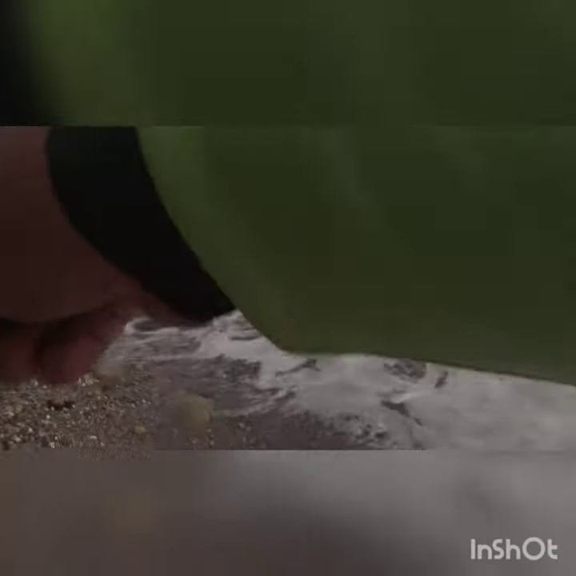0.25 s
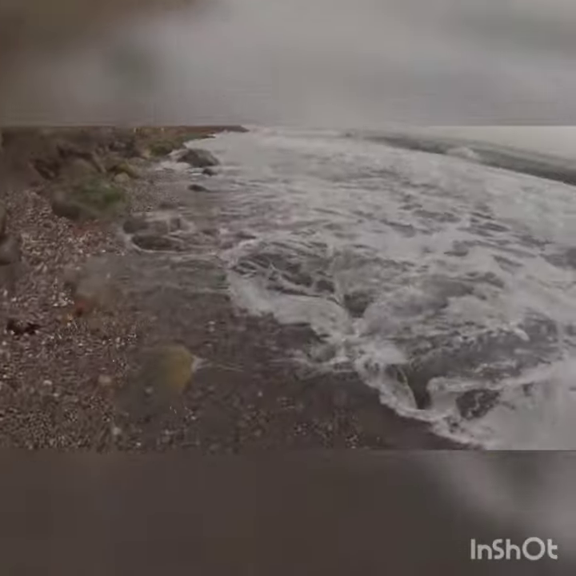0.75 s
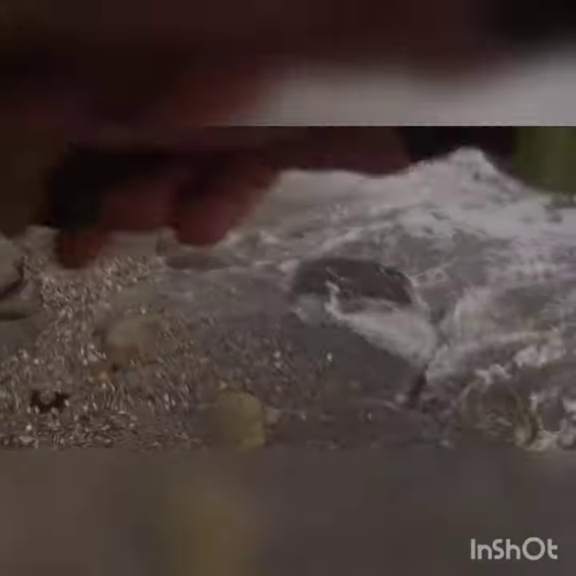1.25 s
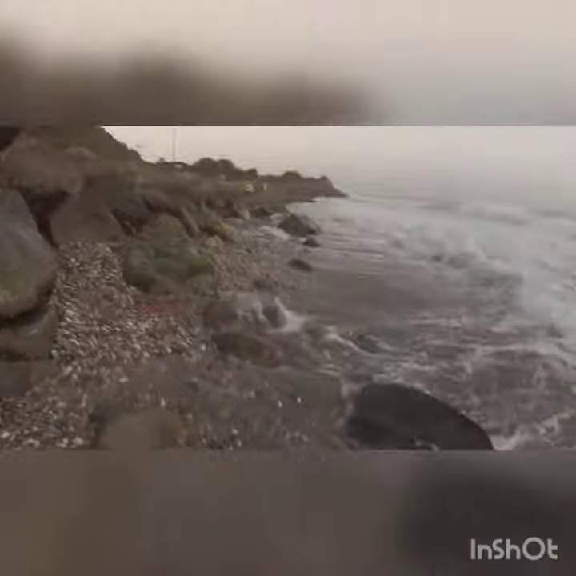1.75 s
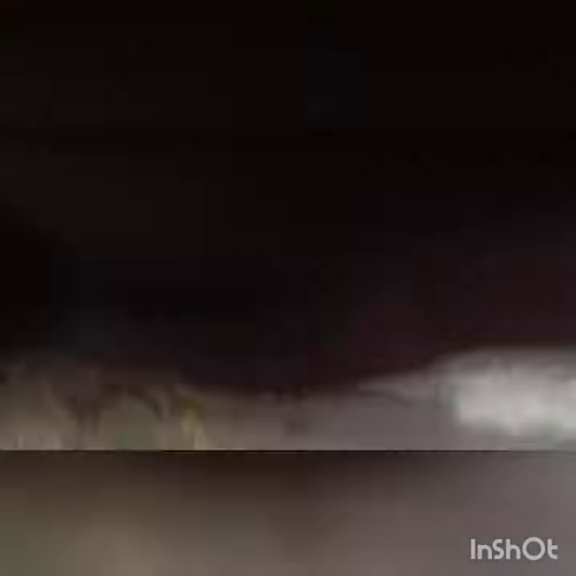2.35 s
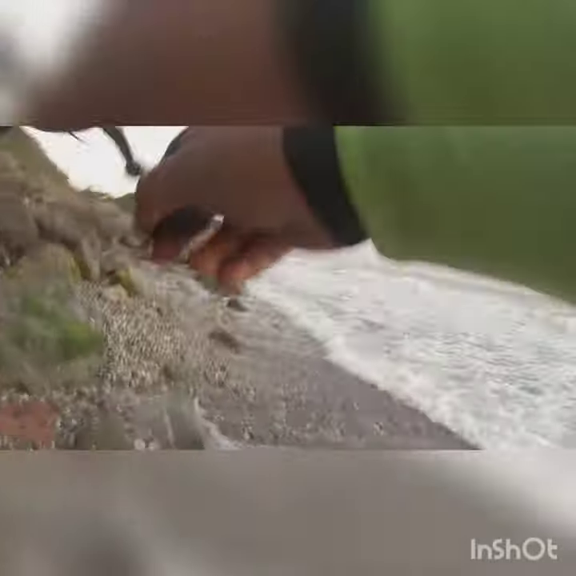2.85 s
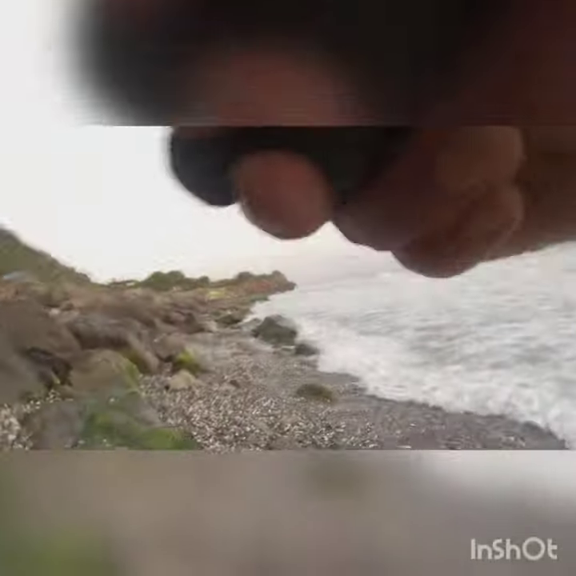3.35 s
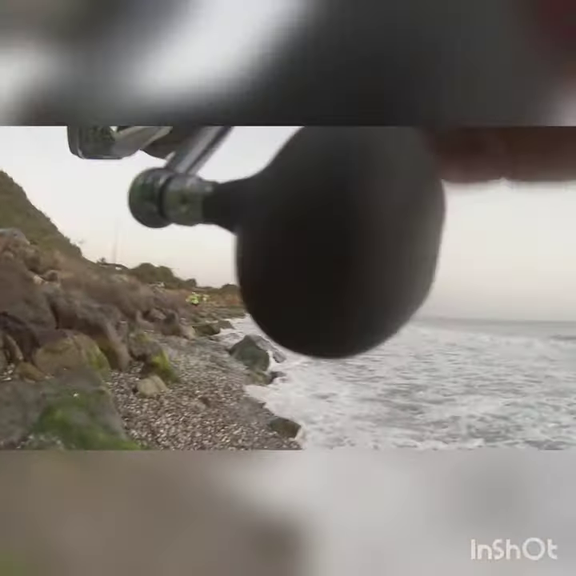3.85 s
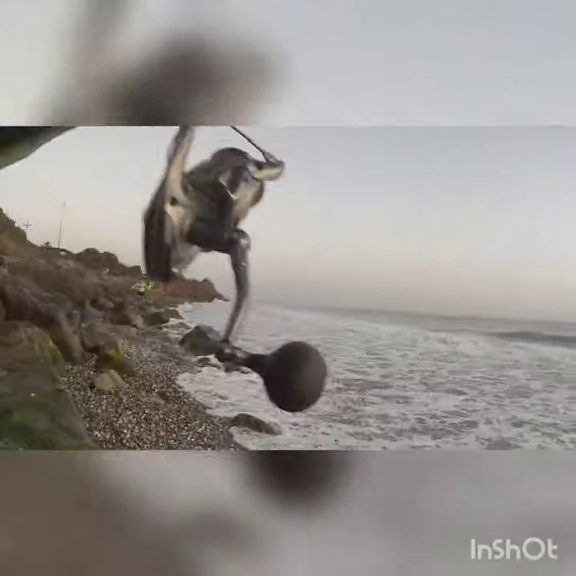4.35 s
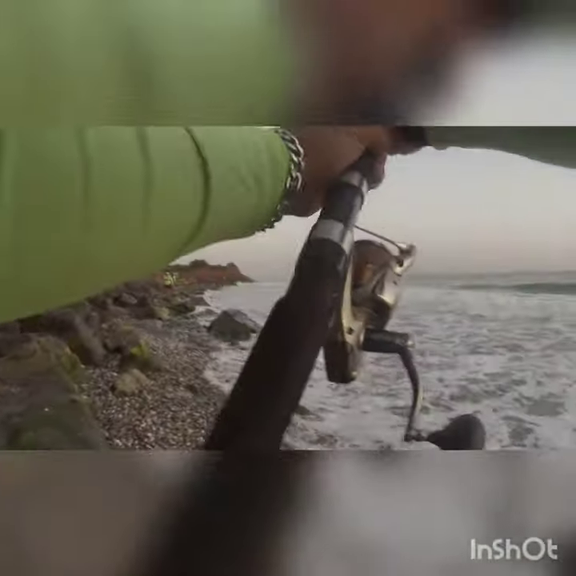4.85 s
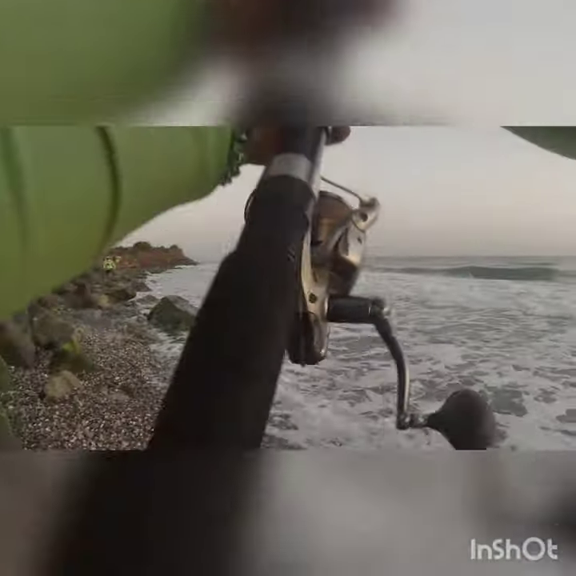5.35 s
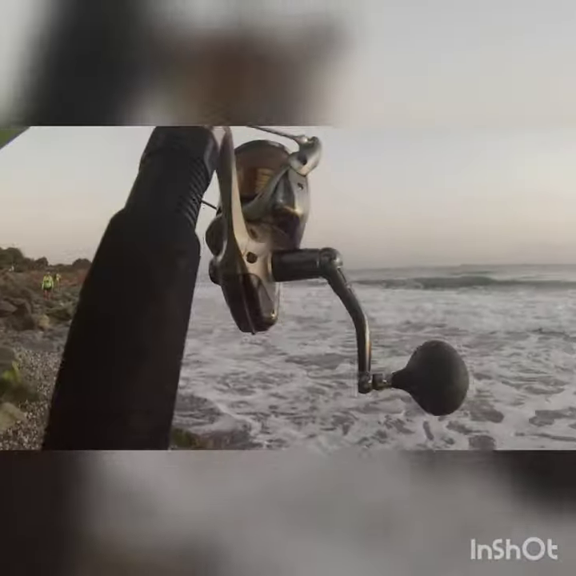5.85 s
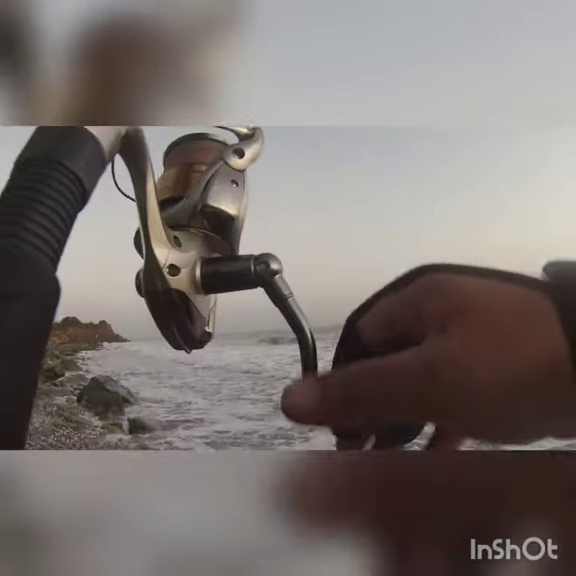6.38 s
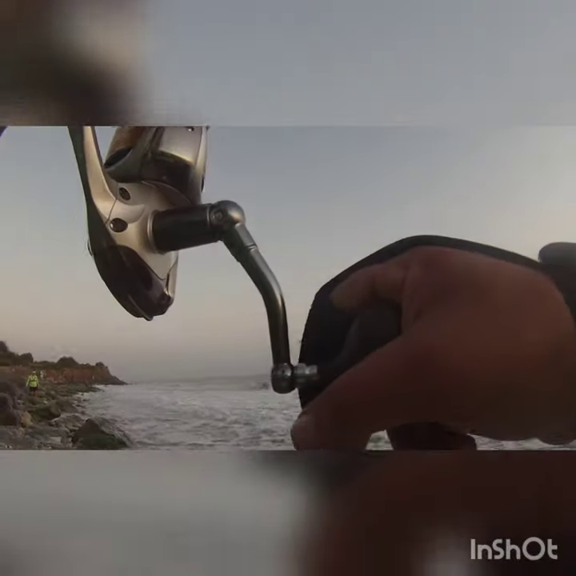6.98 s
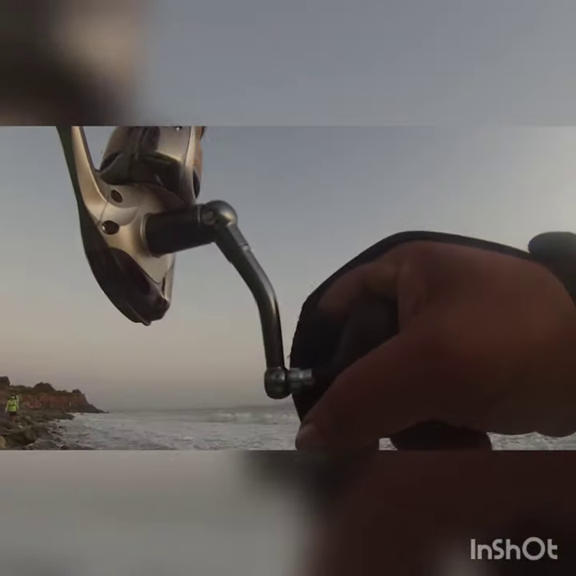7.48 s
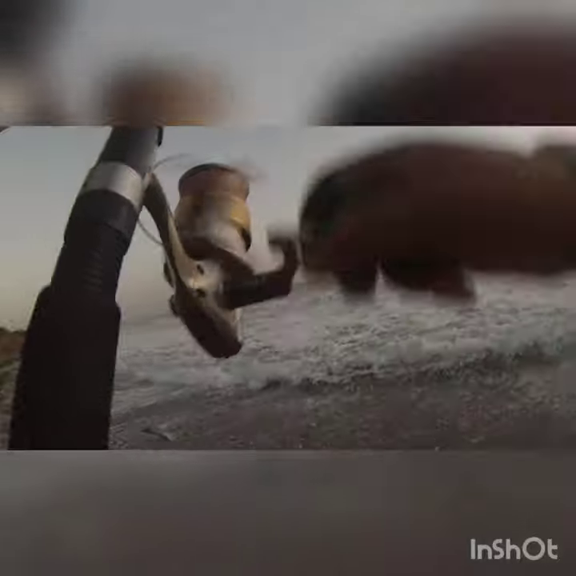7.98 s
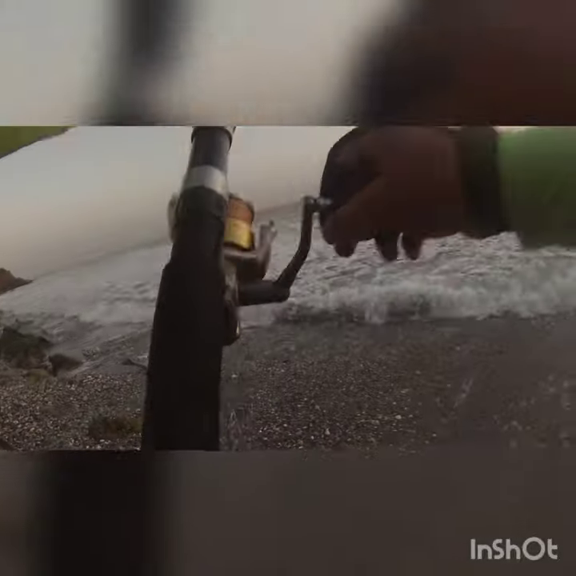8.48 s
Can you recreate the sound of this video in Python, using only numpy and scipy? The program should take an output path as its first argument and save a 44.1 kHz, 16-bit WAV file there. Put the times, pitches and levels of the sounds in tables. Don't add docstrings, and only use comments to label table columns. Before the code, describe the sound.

Continuous hissing, foamy sea wash, close and slightly muffled by a camera shell worn on the body. Soft thuds and cloth brushes come first, then one sharp, heavy plastic crack far louder than everything else. The surf ducks briefly, a wave breaks over pebbles, faint metallic reel clicks scatter, the water eases, and the last, biggest wave surges up.

```python
import sys
import numpy as np
from scipy import signal
from scipy.fft import rfft, irfft, next_fast_len
from scipy.io import wavfile
from scipy.ndimage import uniform_filter1d, map_coordinates

SR = 44100
rng = np.random.default_rng(int(sys.argv[2]) if len(sys.argv) > 2 else 0)


def ratio_of_db(decibels):
    return 10 ** (np.asarray(decibels, float) / 20)


def inscribe(sig):
    pcm = np.round(np.clip(np.atleast_2d(sig).T, -1, 1) * 32767)
    wavfile.write(sys.argv[1], SR, pcm.astype(np.int16))


N = 384552
CLAMP_S = 2.41


def unit(x):
    return x / np.sqrt(np.mean(x ** 2) + 1e-20)


def along(points, hz):
    f, v = np.transpose(points)
    return np.interp(np.log(hz + 1), np.log(f + 1), v)


def curves(rows):
    s, *cols = np.transpose(rows)
    return [np.interp(np.arange(N) / SR, s, c) for c in cols]


def wobble(rate):
    knots = rng.standard_normal(int(N * rate / SR) + 4)
    return map_coordinates(knots, [np.arange(N) * rate / SR])


def filtered(x, gain):
    m = next_fast_len(N + SR // 4)
    return irfft(rfft(x, m) * gain(np.fft.rfftfreq(m, 1 / SR)), m)[:N]


def patchy(depth_db):
    z = signal.stft(rng.standard_normal(N), nperseg=512)[2]
    field = uniform_filter1d(rng.standard_normal(z.shape), 6, 0)
    field = uniform_filter1d(field, 10, 1)
    return signal.istft(z * ratio_of_db(depth_db * unit(field)), nperseg=512)[1][:N]


def steady(x, span):
    return x / np.sqrt(np.abs(uniform_filter1d(x ** 2, round(span * SR))) + 1e-20)


def hiss(count, hz):
    b, a = signal.iirpeak(min(hz, .4 * SR), 1.3, SR)
    once = signal.lfilter(b, a, rng.standard_normal(count))
    return unit(signal.lfilter(b, a, once))


def ring(t, hz, t60):
    return ratio_of_db(-60 * t / t60) * np.sin(2 * np.pi * hz * t)


def add(track, s, x):
    track[round(s * SR):][:len(x)] += x


def cavity(hz):
    # centre_hz, width_hz, level_db
    cavity_modes = [(990, 620, 2.5), (1273, 114, 1.5), (1590, 740, 5), (2080, 83, -4), (2440, 130, 4),
                    (2867, 140, 5), (3300, 770, 4.5), (4670, 210, 8.5), (5310, 130, 5.5), (5614, 300, 7.5),
                    (6250, 190, 3.5), (7750, 390, -5.5), (7960, 370, 4.5), (9900, 900, -2),
                    (13700, 970, -4), (14700, 1300, 2.5)]
    return ratio_of_db(sum(db / (1 + (2 * (hz - centre) / width) ** 2) for centre, width, db in cavity_modes))


def clamp_db():
    fall_s, quick_db, recover_s, lasting_db = .015, -8.5, 0.48, -7.5
    since = np.maximum(np.arange(N) / SR - CLAMP_S, 0)
    return np.clip(since / fall_s, 0, 1) * (lasting_db + quick_db * np.exp(-since / recover_s))


def surf():
    # pitch_hz, density_db (per Hz)
    sea_spectrum = [(71, -20), (120, -5), (184, 0), (389, 0), (841, -10.5), (1510, -8), (2050, -10.5),
                    (3340, -9.5), (5010, -20), (9210, -21.5), (15300, -30)]
    splits_hz = [800, 2100, 4200]
    # start_s, strength_db, foam_db
    wave_course = [(0, -52.5, 2), (.42, -50, 3.5), (.75, -50.5, 4.5), (1.17, -47.5, -0.5), (1.24, -46.5, 1),
                   (1.95, -46, 4.5), (2.3, -45, 0.5), (3.2, -40.5, 0.5), (3.5, -43, -3), (4, -45.5, -1.5),
                   (4.75, -48.5, -2), (5, -45.5, -1.5), (5.25, -49, -2.5), (5.65, -47, 0), (6.5, -48.5, 0),
                   (7.25, -46.5, 1), (7.75, -41.5, 0.5), (8.4, -35.5, -3)]
    # over_calm_db, db_per_strength_db, db_per_foam_db, grit (0-1)
    registers = [
        (-0.5, .5, -0.5, 0.07),
        (-1, 0.76, -0.04, 0.1),
        (-0.5, 0.91, 0.86, 0.14),
        (-7, 0.55, 0.46, 0.3),
    ]
    # start_s, share (0-1)
    facing = [(0, 0.33), (.8, 0.1), (1.6, 0.3), (2.3, 0.7), (3, 0.1), (3.8, 0.1), (4.6, 0.26), (5.4, 0.3),
              (6.2, 0.44), (7, 0.55), (7.6, 0.98), (8.1, 0.7), (8.72, 0.6)]
    calm_db = -47
    edges = [100, *splits_hz, 16000]
    surge = .15 * wobble(3) + .45 * wobble(10)
    struck = rng.random(N) < 600 / SR
    grain_db = np.minimum(4 * rng.exponential(size=N), 12)
    grains = unit(struck * ratio_of_db(grain_db) * rng.standard_normal(N))
    strength_db, foam_db = curves(wave_course)
    sea = np.zeros(N)
    for k, (over_db, grows, foams, grit) in enumerate(registers):
        low_hz, high_hz = edges[k], edges[k + 1]
        db = calm_db + over_db + grows * (strength_db - calm_db) + foams * foam_db

        def colour(hz):
            band = np.sqrt(np.abs(1 / (1 + (hz / high_hz) ** 8) - 1 / (1 + (hz / low_hz) ** 8)))
            return band * cavity(hz) ** 0.63 * ratio_of_db(along(sea_spectrum, hz))

        water = filtered(patchy(depth_db=1.5) + grit * grains, colour)
        sea += ratio_of_db(db + clamp_db() + surge + .3 * wobble(7)) * unit(water)
    boxed = ratio_of_db(-2.5) * filtered(sea, lambda hz: cavity(hz) ** .8 / np.sqrt(1 + (hz / 11000) ** 4))
    share = np.clip(curves(facing)[0], 0, 1)
    return (1 - share) * sea + share * boxed


def knock():
    # start_s, peak_db, hardness_db (per octave above 1 kHz)
    blows = [
        (2.3512, -6.5, 0.5),
        (2.3604, -20.5, -15),
        (2.4553, -46, -21),
    ]
    # pitch_hz, level_db, t60_s
    shell_modes = [(1036, -6.5, 0.025), (1160, -2, 0.02), (1326, 3.5, 0.013), (1500, 0, 0.015),
                   (1800, -6, 0.02), (2400, -3, 0.015), (2970, -8.5, 0.026), (3270, -7.5, 0.019),
                   (4600, -2, 0.0069), (5500, -13, 0.009), (6400, -7.5, 0.0068), (8000, -17.5, .01)]
    out, t = np.zeros(N), np.arange(SR // 5) / SR
    for s, db, hard_db in blows:
        shell = sum(ratio_of_db(level + hard_db * np.log2(hz / 1000)) * ring(t, hz, t60)
                    for hz, level, t60 in shell_modes)
        crack = .4 * ratio_of_db(hard_db - 60 * t / 0.0057) * rng.standard_normal(len(t))
        add(out, s, -ratio_of_db(db) * (shell + crack) * (1 - np.exp(-t / 0.0003)))
    return out


def bumps():
    # start_s, peak_db, pitch_hz, t60_s, direction (-1 inward, 1 outward)
    pushes = [(1.018, -25, 88, 0.061, 1), (1.272, -38, 95, .1, -1), (1.346, -18.5, 153, 0.025, -1),
              (1.385, -29, 101, 0.061, 1), (2.3452, -6.5, 70.4, 0.021, -1), (2.3514, 0.5, 78, 0.022, 1),
              (2.354, -14.5, 32, 0.082, 1), (2.363, -25, 25.3, 0.065, -1), (2.385, -15.5, 91.5, 0.035, 1),
              (2.404, -11.5, 69, 0.052, -1), (2.418, -14, 55, 0.057, 1), (2.455, -32, 300, 0.022, 1),
              (2.4571, -22, 265, 0.026, 1), (2.469, -23, 82, 0.053, -1), (2.551, -37, 71.5, 0.12, -1),
              (3.359, -37, 102, 0.13, -1), (4.29, -41, 109, 0.11, -1)]
    out, t = np.zeros(N), np.arange(SR // 5) / SR
    for s, db, hz, t60, direction in pushes:
        onset = 1 - np.exp(-t * hz / .12)
        add(out, s, np.sign(direction) * ratio_of_db(db) * ring(t, hz, t60) * onset)
    return out


def rattle():
    # start_s, level_db
    shaking = [(2.352, -23), (2.36, -24.5), (2.372, -29.5), (2.381, -43), (2.39, -54), (2.405, -55),
               (2.418, -47), (2.423, -55)]
    # pitch_hz, density_db (per Hz)
    loose_spectrum = [(300, 5.5), (700, -11), (1500, -0.5), (3500, -12), (6000, -20.5), (10000, -25),
                      (16000, -34)]
    loose = unit(filtered(rng.standard_normal(N), lambda hz: ratio_of_db(along(loose_spectrum, hz)) * cavity(hz)))
    now = np.arange(N) / SR
    return ratio_of_db(curves(shaking)[0]) * loose * (now > shaking[0][0]) * (now < shaking[-1][0])


def tackle():
    # start_s, peak_db, ring_hz, rattle_db, rattle_hz
    clicks = [(0.174, -40, 2400, 7.5, 7300), (1.217, -34.5, 1340, 3, 6140), (3.268, -40, 5070, 3, 10000),
              (3.277, -50, 3190, 11, 10000), (3.353, -41, 2410, 10, 1700), (3.761, -38.5, 2400, 1.5, 4500),
              (3.7905, -31.5, 1540, 9.5, 2490), (3.806, -43, 3200, 1, 4500), (3.821, -48, 3000, -1, 4500),
              (4.247, -45, 3300, -3, 4500), (4.411, -52, 5340, 5, 8000), (4.483, -40, 2400, -6, 2500),
              (4.494, -36.5, 2360, 1, 4620), (4.589, -42, 3420, -9, 3980), (4.594, -39, 3480, -2, 5500),
              (4.846, -47, 3400, 4, 5000), (5.545, -54, 4740, 13, 8000), (5.629, -37.5, 1350, -4, 1500)]
    # start_s, length_s, level_db, centre_hz
    rubs = [(.16, 0.042, -52, 1500), (0.163, 0.03, -55, 6500), (0.379, 0.1, -56, 3300),
            (0.605, 0.067, -52, 3000), (0.606, 0.032, -59, 7560), (1.216, 0.011, -49, 11500),
            (1.2165, 0.014, -46, 3200), (2.404, 0.019, -43, 3050), (2.408, 0.01, -51, 4500),
            (2.451, 0.015, -50.5, 990), (2.755, 0.023, -58.5, 6100), (3.233, 0.067, -59, 3600),
            (3.645, .015, -54, 1944), (3.72, .012, -53, 1389), (3.753, 0.045, -56, 4500),
            (3.757, .016, -52.5, 2100), (3.797, 0.041, -51, 3240), (4.199, 0.27, -62, 1100),
            (4.248, 0.27, -62.5, 3300), (4.26, 0.11, -64, 7000), (4.388, 0.055, -63, 7000),
            (4.41, .11, -58, 2400), (4.587, .016, -56.5, 4500), (6.75, 1.5, -65, 7315),
            (7.6, 0.8, -61, 3050), (8.418, .28, -69, 10800)]
    ring_t60_s, rattle_t60_s = 0.016, 0.022
    out, t = np.zeros(N), np.arange(SR // 10) / SR
    for s, db, hz, rattle_db, rattle_hz in clicks:
        noise = ratio_of_db(rattle_db - 12.5 - 60 * t / rattle_t60_s) * hiss(len(t), rattle_hz)
        click = ring(t, hz, ring_t60_s) + noise
        add(out, s, ratio_of_db(db) * click * (1 - np.exp(-t / 0.00052)))
    for s, length, db, hz in rubs:
        swell = np.sin(np.linspace(0, np.pi, round(length * SR))) ** .8
        slip_db = np.repeat(rng.normal(0, 2.5, len(swell) // 128 + 1), 128)[:len(swell)]
        add(out, s, ratio_of_db(db) * swell * ratio_of_db(slip_db) * hiss(len(swell), hz))
    return filtered(out, cavity)


def wind():
    # centre_s, length_s, buffet_db, drum_db
    puffs = [(0.198, .12, -48, -46.5), (0.264, 0.075, -34, -58), (.62, .2, -51, -59),
             (0.847, 0.16, -52, -49), (1.046, .1, -44, -47.5), (1.334, 0.14, -35, -40),
             (1.775, .1, -39, -53.5), (1.912, 0.15, -39, -48.5), (2.205, 0.093, -39, -57),
             (2.308, .07, -35, -46), (2.515, .14, -43, -43), (2.961, 0.13, -48.5, -52),
             (3.38, 0.17, -39, -45.5), (3.856, 0.24, -47, -59.5), (4.194, 0.18, -52, -53.5),
             (4.327, .1, -47.5, -51.5), (4.906, 0.091, -53, -47.5), (4.99, 0.14, -40, -59),
             (5.074, 0.092, -52, -53), (5.455, 0.12, -53, -65), (5.706, .2, -60, -53.5),
             (6.23, 0.078, -50.5, -54), (3.13, 0.084, -52, -53), (7.0, 0.059, -48, -61),
             (2.693, 0.065, -58, -54), (7.728, 0.16, -48, -58.5), (7.94, 0.1, -40, -55),
             (8.093, 0.13, -53, -53.5), (8.305, .1, -48.5, -58), (8.47, .15, -50, -59)]
    # pitch_hz, density_db (per Hz)
    buffet_spectrum = [(4, -39), (10, 9), (20, 1.5), (32, -7), (55, -9.5), (80, -43), (160, -120)]
    # pitch_hz, density_db (per Hz)
    drum_spectrum = [(20, -120), (45, -22), (65, -0.5), (100, 7.5), (140, -1), (200, -24), (500, -120)]
    breeze_db, hum_db = -53.5, -59
    flutter_db, wind_rise_db = 2.5, 4
    flutter = flutter_db * np.array([wobble(14), wobble(15)])
    lull = clamp_db() + wind_rise_db * (np.arange(N) > CLAMP_S * SR) + flutter
    power = ratio_of_db(lull + [[breeze_db], [hum_db]]) ** 2
    now = np.arange(N) / SR
    for s, length, *levels_db in puffs:
        near = slice(max(round((s - 2 * length) * SR), 0), round((s + 2 * length) * SR))
        bell = ratio_of_db(-24 * ((now[near] - s) / length) ** 2)
        power[:, near] += (ratio_of_db(levels_db)[:, None] * bell) ** 2
    buffet = filtered(rng.standard_normal(N), lambda hz: ratio_of_db(along(buffet_spectrum, hz)))
    drum = filtered(rng.standard_normal(N), lambda hz: ratio_of_db(along(drum_spectrum, hz)))
    return np.sqrt(power[0]) * steady(buffet, span=0.135) + np.sqrt(power[1]) * steady(drum, span=0.11)


def scene():
    blow = filtered(knock() + bumps() + rattle(), lambda hz: 1 / (1 + (hz / 16000) ** 60))
    rest = filtered(surf() + wind() + tackle(), lambda hz: hz < 15290)
    return (rest + blow)[None]


def low_pass(x):
    return signal.sosfilt(signal.butter(12, 16430, fs=SR, output="sos"), x)


def record(dry):
    # start_s, level_db
    duck = [
        (2.336, -4),
        (2.34, -9),
        (2.345, -25),
        (2.347, -1.5),
    ]
    ducked = dry[0] * ratio_of_db(curves(duck)[0])
    held = ducked / (1 + np.abs(ducked / .96) ** 8) ** (1 / 8)
    return low_pass(held[None])


dry = scene()
out = record(dry)
inscribe(out)
```